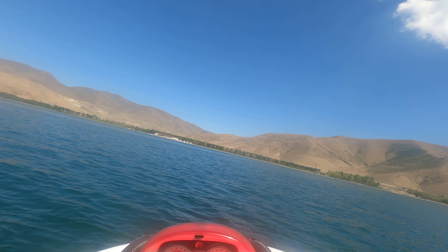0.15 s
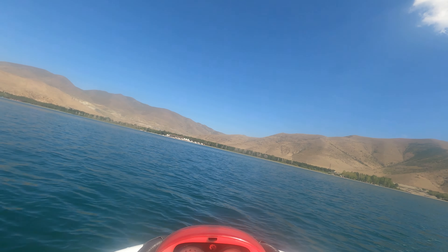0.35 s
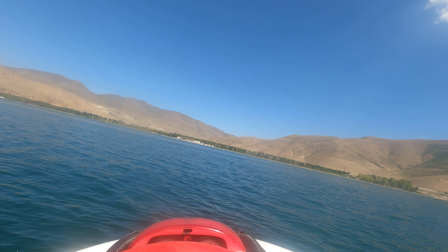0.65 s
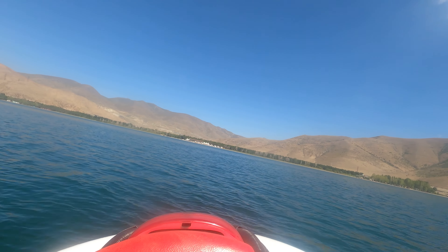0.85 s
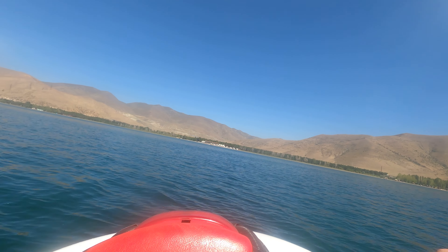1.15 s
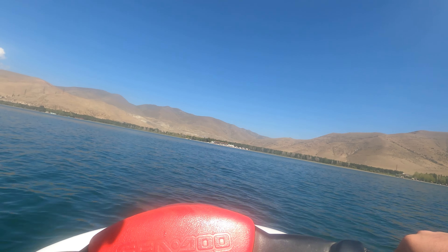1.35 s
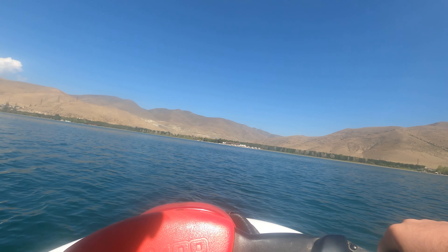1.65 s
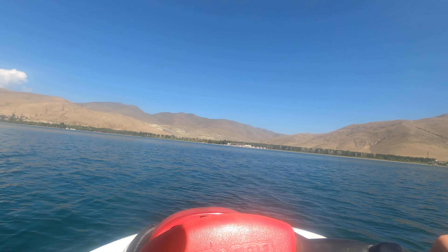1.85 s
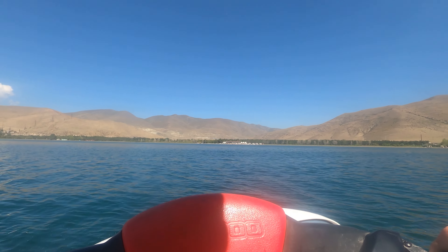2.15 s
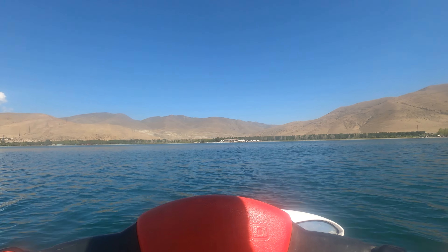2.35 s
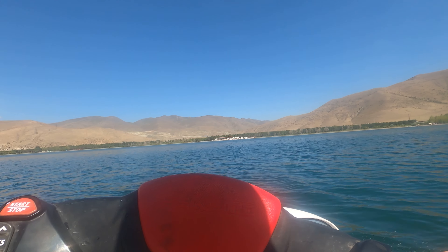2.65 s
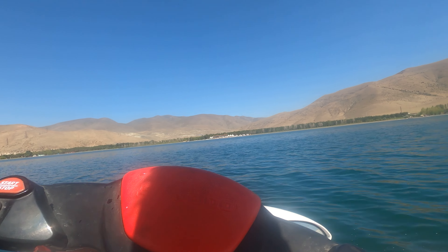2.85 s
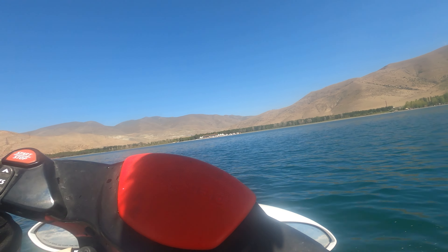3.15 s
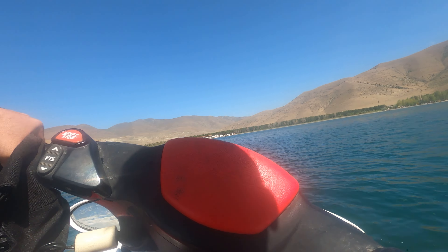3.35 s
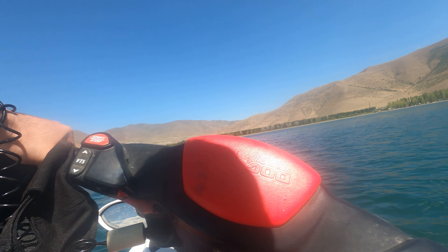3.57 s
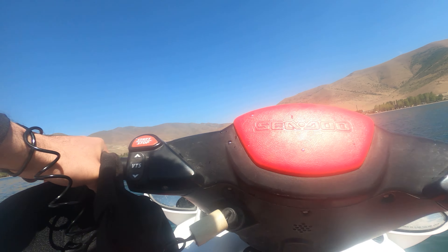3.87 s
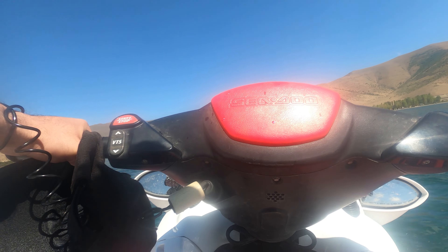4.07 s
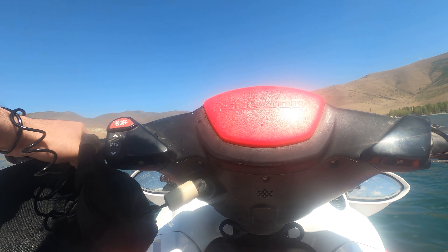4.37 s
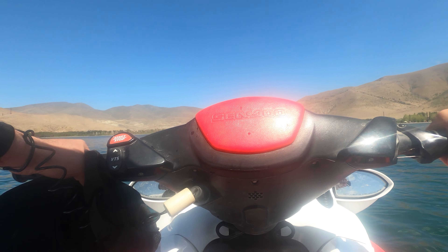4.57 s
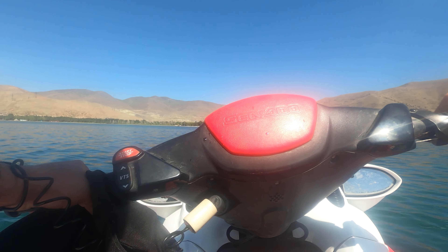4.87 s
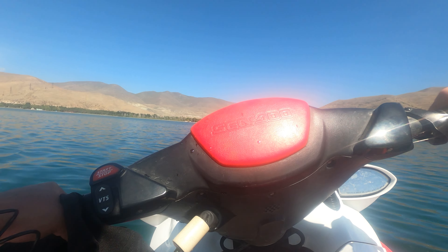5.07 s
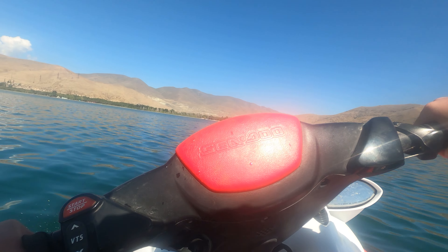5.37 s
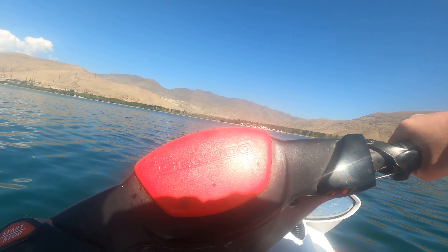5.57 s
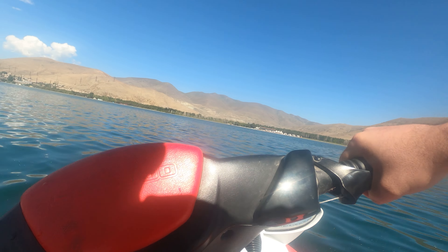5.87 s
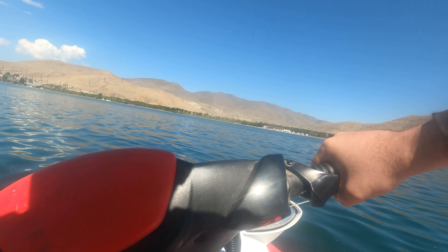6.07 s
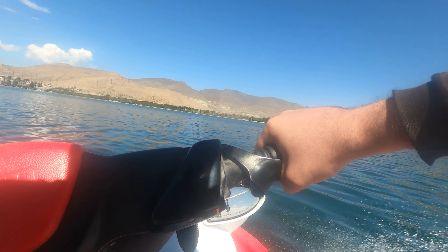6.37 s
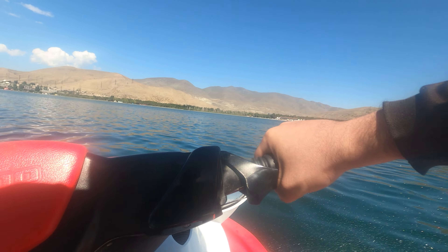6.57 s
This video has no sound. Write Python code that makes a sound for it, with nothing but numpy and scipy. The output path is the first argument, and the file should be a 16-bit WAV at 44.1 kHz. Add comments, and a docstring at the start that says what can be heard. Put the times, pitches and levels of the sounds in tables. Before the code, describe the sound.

A close, windy onboard sound: a three-cylinder engine hums and growls continuously at nearly constant speed, with rattling clatter and water rushing along the hull. Spray flares in short bursts. The growl thins around two seconds, returns with a whine and bubbling exhaust between three and four, thins again, then strengthens towards the end. Wind thumps throughout, and the wide stereo closes to the centre by three seconds.

```python
"""Riding a personal watercraft

A small watercraft cruises over a lake at steady throttle, heard from the rider's chest.
Wind buffets the microphone, water rushes along the hull, spray hisses and gusts slap: all shaped noise.
The three-cylinder engine drones in tones tied to its slightly hunting speed, with a whine and a clatter.
The exhaust gurgles when it dips under water. Part-way through, the wide stereo image closes almost to mono.
"""
import sys
import numpy as np
from scipy import signal
from scipy.fft import rfft, irfft
from scipy.io import wavfile
from scipy.ndimage import uniform_filter1d, minimum_filter1d

SR = 44100
rng = np.random.default_rng(int(sys.argv[2]) if len(sys.argv) > 2 else 0)


def store_wav(level_fs):
    """Save 16-bit WAV to argv[1]."""
    pcm = np.round(np.clip(np.atleast_2d(level_fs), -1, 1) * 32767)
    wavfile.write(sys.argv[1], SR, pcm.T.astype(np.int16))


N = 296352
TIME = np.arange(N) / SR
BINS = np.fft.rfftfreq(N, 1 / SR)
FIRINGS = 3  # per engine cycle, which is two crank turns


def amp(db):
    """Turns decibels into a gain."""
    return 10 ** (np.asarray(db) / 20)


def unit(x):
    """Scales a sound to an average strength (rms) of 1."""
    return x / np.sqrt(np.mean(x ** 2) + 1e-20)


def curve(rows):
    """Joins (time [s], value) rows with straight lines."""
    return np.interp(TIME, *np.transpose(rows))


def across(points):
    """Joins (frequency [Hz], value) rows with straight lines on a log-frequency axis."""
    hz, value = np.transpose(points)
    return np.interp(np.log(BINS + 1), np.log(hz + 1), value)


def swells(rows):
    """Adds up bell-shaped swells from (time [s], length [s], height [dB]) rows."""
    total = np.zeros(N)
    for s, length, db in rows:
        total = total + db * np.exp(-(2 * (TIME - s) / length) ** 2)
    return total


def wander(rate_hz):
    """Smooth random drift of rms 1; changes much faster than the given rate are filtered out."""
    spectrum = rfft(rng.standard_normal(N))
    return unit(irfft(spectrum / (1 + (BINS / rate_hz) ** 4), N))


def tint(x, colour, modes=()):
    """Colours a sound by a spectrum and by resonances, which lift narrow bands; rms 1."""
    db = across(colour)
    for hz, width, lift in modes:
        db = db + lift / (1 + (2 * (BINS - hz) / width) ** 2)
    return unit(irfft(rfft(x) * amp(db), N))


# How alike the left and right noise is: (frequency [Hz], likeness [0 to 1])
LIKENESS = [(30, .7), (70, .8), (120, .92), (300, .95), (700, .94), (1500, .9), (2800, .77), (5000, .6),
            (8000, .45), (12000, .15)]


def noise(colour, modes=(), drive=1):
    """Turbulence at two microphone ports, least alike in the treble; drive shapes it before colouring."""
    shared, apart = rfft(rng.standard_normal((2, N)) * drive)
    same = np.clip(across(LIKENESS), 0, 1)
    mid = shared * np.sqrt(1 + same)
    side = apart * np.sqrt(1 - same)
    return tint(irfft(np.array([mid + side, mid - side]), N), colour, modes)


# Wind strength at the microphone: (time [s], level [dB])
WIND_STRENGTH = [(0, -2.5), (1.4, 0), (1.95, -0.5), (2.3, -4), (3.7, 4.5), (5.1, 2.5), (6.1, -2.5),
                 (6.72, 1.5)]
# Which way the microphone faces: (time [s], 0 to the bow up to 1 down at the handlebars)
FACING = [(0, 0.013), (1.1, 0.097), (1.8, 0.45), (2.7, 0.47), (3.2, 1), (4.3, 0.91), (4.7, 0.69),
          (5.6, 0.77), (6.1, 0.42), (6.72, 0)]
# Relative spectra of the buffeting and the rush: (frequency [Hz], level [dB per Hz])
BUFFET_COLOUR = [(6, -9), (16, -2.5), (26, 3), (50, -2), (80, -3), (130, -11), (200, -8.5), (300, -15),
                 (600, -29.5), (2000, -79.5)]
RUSH_COLOUR = [(40, -17.5), (100, -1), (200, 0.5), (320, 1.5), (400, -4.5), (470, -5), (560, -5.5),
               (670, -9.5), (750, -9.5), (850, -19.5), (1200, -23.5), (3000, -42), (8000, -76.5)]


def wind(eddies, buffet_db=-23.0, gust_db=1., gust_hz=11.0,
         rush_db=-22.0, rush_follow=0.35, rush_facing_db=-1.5, flutter_db=1.9):
    """Gusty low buffeting on the microphone, and a rush that flutters with the eddies."""
    buffet_level = buffet_db + curve(WIND_STRENGTH) + gust_db * wander(gust_hz)
    buffet = amp(buffet_level) * noise(BUFFET_COLOUR)
    # the rush follows only part of the wind's rise and fall
    rush_level = rush_db + rush_follow * curve(WIND_STRENGTH) + rush_facing_db * curve(FACING)
    rush = amp(rush_level) * noise(RUSH_COLOUR, drive=amp(flutter_db * eddies))
    return buffet + rush


# How much water the hull throws up: (time [s], level [dB])
WAKE = [(0, 2.5), (.4, -2), (1.7, 3.5), (2.1, -4), (2.5, -4), (3.3, 1), (4.5, -.5), (4.8, -1), (5.2, -1.5),
        (5.7, 0.5), (6.15, -2), (6.6, 2)]
# The hull meets a wavelet and the spray flares: (time [s], length [s], lift [dB])
SPLASHES = [(.19, 0.025, 4), (.6, .06, 5.5), (.77, 0.066, 5), (2.1, .04, 4), (2.83, .06, 4),
            (3.38, 0.066, 5), (3.62, .04, 3), (3.76, 0.14, 6), (4.25, 0.037, 6.5), (4.55, 0.11, 3),
            (5.53, 0.044, 3.5)]
# Relative spectrum of the hiss: (frequency [Hz], level [dB per Hz])
SPRAY_COLOUR = [(500, -15.5), (1500, 1.5), (2800, 3.5), (4000, 1.5), (5500, -2.5), (7000, -5), (7900, -7.5),
                (8600, -12.5), (10000, -15.5), (12000, -26.5), (15000, -40.5)]
# Ringing of the small microphone port: (frequency [Hz], width [Hz], lift [dB])
PORT_MODE = [(7620, 330, 7)]
# Level of the faint treble band above about 9 kHz, before its overall boost: (time [s], level [dB])
TREBLE_LEVEL = [(0, -65), (1.0, -67), (1.93, -66), (2.02, -90), (2.9, -86), (3.35, -73), (3.76, -66),
                (4.0, -90), (6.1, -90), (6.72, -78)]
# Relative spectrum of the faint treble band: (frequency [Hz], level [dB per Hz])
TREBLE_COLOUR = [(5000, -29.5), (8500, -9), (10000, -2), (11000, -2), (12200, 1), (13500, -5.5),
                 (15500, -7.5)]


def spray(eddies, chop, level_db=-44.5, flutter_db=0.64, grain_db=0.6, treble_boost_db=2.5):
    """Grainy hiss of thrown water, ringing the port, with a faint top-treble band that cuts in and out."""
    grain = amp(flutter_db * eddies + grain_db * wander(700))
    hiss_level = level_db + curve(WAKE) + swells(SPLASHES) + chop
    hiss = amp(hiss_level) * noise(SPRAY_COLOUR, PORT_MODE, grain)
    treble = amp(curve(TREBLE_LEVEL) + treble_boost_db) * noise(TREBLE_COLOUR, drive=grain)
    return hiss + treble


# Sharp gusts: (time [s], level before panning [dB], rise [s], fall [s],
#               pan [-1 left to 1 right], bright snap [share of the gust's strength])
SLAPS = [(1.951, -24, .002, .008, -.9, .05), (1.964, -20, .01, .006, -.9, .1),
         (2.005, -29, .012, .008, .9, 0), (2.102, -23, .002, .008, -.6, .2),
         (2.315, -30, .01, .015, -.9, .15), (3.576, -26, .002, .005, 0, .1),
         (4.044, -25, .002, .006, 0, .1), (4.738, -26, .002, .006, 0, .15), (4.838, -28, .016, .008, 0, 0),
         (4.908, -30, .008, .008, 0, 0), (5.013, -26, .004, .002, 0, .05), (5.049, -17, .007, .002, 0, .2),
         (5.0545, -14.5, .002, .003, 0, .35), (5.101, -21, .001, .003, 0, 0),
         (5.121, -28, .008, .012, 0, .1), (5.1305, -18.5, .001, .002, 0, .5),
         (6.413, -25, .002, .005, 0, .1)]
# Relative spectra of the slap and its snap: (frequency [Hz], level [dB per Hz])
SLAP_COLOUR = [(60, -8), (300, 14), (900, 17), (1400, 6), (2100, -9.5), (3200, -29.5), (5000, -28),
               (12000, -55.5)]
SNAP_COLOUR = [(500, -20), (1400, 5), (2000, 2), (3200, -9.5), (4500, -16.5), (7000, -25.5), (12000, -48.5)]


def slaps():
    """Each sharp gust builds for a moment and breaks off; some strike one port harder, some carry a snap."""
    force, snap = np.zeros((2, 2, N))
    for s, db, rise, fall, pan, bright in SLAPS:
        shape = np.exp(-np.maximum((s - TIME) / rise, (TIME - s) / fall))
        gust = np.outer([1 - pan, 1 + pan], amp(db) * shape)
        force = force + gust
        snap = snap + bright * gust
    return force * noise(SLAP_COLOUR) + snap * noise(SNAP_COLOUR)


# Relative spectrum of exhaust blowing through water: (frequency [Hz], level [dB per Hz])
GURGLE_COLOUR = [(20, -30.5), (60, -12), (105, 1.5), (170, -4.5), (340, 5), (600, -1.5), (800, -3.5),
                 (1200, -15), (3000, -42), (12000, -90)]


def gurgle(cycles, dunk, level_db=-21.0, puff_db=1.5):
    """What a dunk takes from the boom comes back as bubbling, puffed out by each firing."""
    puffs = amp(puff_db * np.cos(2 * np.pi * FIRINGS * cycles))
    taken = 1 - amp(-dunk)
    return amp(level_db) * taken * noise(GURGLE_COLOUR, drive=puffs)


# Base engine speed: (time [s], speed [cycles per second])
SPEED = [(0, 42.6), (1.6, 42.58), (2.2, 42.63), (3.3, 42.62), (3.7, 42.85), (4.5, 42.8), (5.0, 42.5),
         (6.72, 42.45)]


def crank(hunt_hz=6.6, hunt_depth=0.0175, jitter=0.00532):
    """Counts engine cycles; the speed hunts up and down several times a second and jitters slightly."""
    hunt_rate = hunt_hz * (1 + 0.149 * wander(2.496))
    hunt = np.sin(2 * np.pi * np.cumsum(hunt_rate) / SR)
    speed = curve(SPEED) * (1 + hunt_depth * hunt + jitter * wander(30))
    return np.cumsum(speed) / SR


# Gear whine, lying between the engine orders: (time [s], level [dB])
WHINE_LEVEL = [(0, -47), (.85, -42), (2.0, -45), (3.0, -41), (3.4, -28.5), (4.15, -33), (4.4, -46),
               (5.7, -44.5), (6.1, -35.5), (6.72, -37)]


def whine(cycles, gear_ratio=17.4, octave_db=-14.5, rough=0.5, slip=.07):
    """A wavering gear tone and its octave, geared to the crank."""
    turns = gear_ratio * cycles + slip * wander(22)  # slip in turns of the gear mesh
    sound = np.cos(2 * np.pi * turns) + amp(octave_db) * np.cos(2 * np.pi * 2 * turns)
    return amp(curve(WHINE_LEVEL)) * unit(sound * (1 + rough * wander(9.8)))


# How strongly the clatter reaches the microphone: (time [s], level [dB])
BAY_LEVEL = [(0, -0.5), (.55, -1), (1.93, 0.5), (2.1, -2), (2.8, -2), (3.7, -2.5), (4.1, -0.5), (4.4, -4.5),
             (4.7, -5), (5.2, -10.5), (5.55, -7.5), (5.8, -5), (6.72, -0.5)]
# Relative spectrum of the clatter: (frequency [Hz], level [dB per Hz])
CLATTER_COLOUR = [(200, -23.5), (500, -10), (750, -0.5), (900, 4), (1250, -3.5), (1700, -5.5), (2300, -11),
                  (3200, -18.5), (5000, -26.5), (8000, -36), (14000, -66)]
# Engine bay resonances facing the bow, then facing down: (frequency [Hz], width [Hz], lift [dB])
BOW_MODES = [(740, 36, 7.5), (1020, 91, 4.5), (1620, 170, 1.5), (2800, 230, 0)]
DOWN_MODES = [(750, 210, 5), (1150, 240, -3.5), (1465, 150, 6), (2750, 250, 5)]


def clatter(cycles, eddies, chop, level_db=-28.5, knock_db=-7.0,
            turn_db=0.5, firing_db=0.3, flutter_db=1.0, size=1024):
    """Mechanical noise swells with each crank turn and each firing, and rings the engine bay."""
    turn_beat = turn_db * np.cos(2 * np.pi * 2 * cycles)
    firing_beat = firing_db * np.cos(2 * np.pi * FIRINGS * cycles)
    drive = amp(turn_beat + firing_beat + flutter_db * eddies)
    down = np.clip(curve(FACING), 0, 1)
    sound = np.zeros((2, N))
    for share, modes in (1 - down, BOW_MODES), (down, DOWN_MODES):
        # valves and pistons repeat the same train of knocks in every cycle
        train = rng.standard_normal(size)
        knocks = np.interp(cycles, np.arange(size) / size, train, period=1)
        rattle = noise(CLATTER_COLOUR, modes, drive)
        knocking = amp(knock_db) * tint(knocks * drive, CLATTER_COLOUR, modes)
        sound += np.sqrt(share) * (rattle + knocking)
    return amp(level_db + curve(BAY_LEVEL) + chop) * sound


def tone(cycles, order, unevenness, dispersion=.125):
    """One multiple (order) of the cycle rate, uneven in strength; phase shifts smear the exhaust pulse."""
    # the exhaust delays high orders more
    phase = order * cycles - dispersion * order ** 2
    return np.sqrt(2) * np.cos(2 * np.pi * phase) * (1 + unevenness * wander(15))


# Balance of the growl's tones: (multiple of the cycle rate, relative level [dB])
GROWL_ORDERS = [(8, 0.5), (9, 3.5), (10, -4.5), (11, -11), (12, -7.5), (13, -6.5), (14, -3), (15, -1.5),
                (16, -12), (17, -8.5), (18, -7.5), (19, -12.5), (21, -9), (23, -16.5), (24, -10.5),
                (25, -22)]
# Strength of the whole growl: (time [s], level [dB])
GROWL_LEVEL = [(0, -34), (1.9, -34), (2.1, -40.5), (2.9, -35), (3.6, -34), (4.15, -34.5), (4.4, -42),
               (5.3, -40), (5.9, -32.5), (6.72, -33)]


def growl(cycles):
    """The higher orders, which swell and fade as the craft turns."""
    orders = sum(amp(db) * tone(cycles, order, unevenness=.33) for order, db in GROWL_ORDERS)
    return amp(curve(GROWL_LEVEL)) * orders


# Low hum beside the firing note and boom: (multiple of the cycle rate, relative level [dB])
HUM_ORDERS = [(2, -10), (4, 0), (5, -1.5), (7, -8.5)]
# Firing note, three to a cycle, sinking in the middle of the turn: (time [s], level [dB])
FIRING_LEVEL = [(0, -19), (1.9, -20.5), (2.1, -20.5), (3, -24.5), (4.1, -30), (4.55, -25), (5.3, -29),
                (6.72, -18)]
# Exhaust boom, an octave above the firing note: (time [s], level [dB])
BOOM_LEVEL = [(0, -13), (1.3, -15.5), (1.65, -12.5), (2.0, -16.5), (3.0, -16), (3.9, -13.5), (4.45, -16.5),
              (5.05, -16.5), (6.2, -15), (6.72, -16.5)]


def drone(cycles, dunk, bob, hum_db=-16.5, hum_follow=0.44, hum_rough=0.17, boom_rough=0.034,
          wobble_db=1.7, wobble_hz=8., waver_db=0.17, facing_waver_db=2.5, waver_hz=7.):
    """Exhaust tones: unequal cylinders fill in a hum; the boom rocks with the hull and chokes in dunks."""
    hum_tones = sum(amp(db) * tone(cycles, order, hum_rough) for order, db in HUM_ORDERS)
    hum = amp(hum_db + hum_follow * curve(FIRING_LEVEL)) * hum_tones
    # the firing note wavers more when the microphone faces down
    waver = (waver_db + facing_waver_db * curve(FACING)) * wander(waver_hz)
    firing = amp(curve(FIRING_LEVEL) + waver) * tone(cycles, FIRINGS, boom_rough)
    boom_level = curve(BOOM_LEVEL) + bob - dunk + wobble_db * wander(wobble_hz)
    boom = amp(boom_level) * tone(cycles, 2 * FIRINGS, boom_rough)
    return hum + firing + boom


# The exhaust outlet dips under water, choking the boom: (time [s], length [s], depth [dB])
DUNKS = [(.32, .04, 1), (.47, .04, 6.5), (1.4, .05, 4), (1.99, 0.27, 4), (2.58, .14, 2.5), (2.8, 0.077, 4),
         (3.17, 0.07, 19), (3.62, 0.069, 13), (3.72, 0.075, 17), (4.05, 0.15, 9.5), (4.18, 0.087, 24),
         (5.02, 0.1, 7.5), (5.13, 0.045, 7), (5.53, 0.071, 5), (5.69, .08, 14), (6.55, 0.041, 15)]
# The clatter and hiss drop away briefly: (time [s], length [s], depth [dB])
LULLS = [(2.04, 0.066, 5.5), (2.31, 0.046, 2), (3.47, 0.067, 3), (4.42, 0.045, 2), (4.79, 0.048, 4),
         (5.16, 0.1, 4.5), (5.45, 0.05, 4.5), (5.62, 0.068, 5), (6.12, 0.043, 0.5)]


def scene(chop_db=0.7, chop_hz=11.0, bob_db=-0.35, bob_hz=3.98):
    """Wind, water and engine; shared eddies shake the noises, and chop rocks clatter and spray alike."""
    cycles, dunk = crank(), swells(DUNKS)
    eddies = unit(wander(53) + .5 * wander(220))
    chop = chop_db * wander(chop_hz) - swells(LULLS)
    bob = bob_db * np.cos(2 * np.pi * bob_hz * TIME)
    surroundings = wind(eddies) + spray(eddies, chop) + slaps() + gurgle(cycles, dunk)
    engine = whine(cycles) + clatter(cycles, eddies, chop) + growl(cycles) + drone(cycles, dunk, bob)
    fade = signal.windows.tukey(N, .001)  # a few milliseconds at each end
    return fade * (surroundings + engine)


def limit(x, ceiling_db=-3.5, hold_s=0.016, order=6):
    """A quick limiter with a soft knee turns down the loudest peaks in both channels together."""
    span = max(int(hold_s * SR), 2)
    gain = (1 + (abs(x).max(0) / amp(ceiling_db)) ** order) ** (-1 / order)
    return x * uniform_filter1d(minimum_filter1d(gain, span), span)


# Colour difference of the ports, before the width changes: (frequency [Hz], left minus right [dB])
LEAN = [(60, 4.5), (130, -2), (270, -0.5), (580, -1.5), (1220, -2.5), (2600, -1.5)]
# Stereo width, as gain on the left-right difference: (time [s], level [dB])
WIDTH = [(0, -4), (1.0, 1), (1.9, 3), (2.05, 4), (2.2, -0.5), (2.5, -5), (2.8, -12.5), (3.05, -46.5),
         (6.72, -50.5)]


def record(dry, edge_hz=15700):
    """Limits peaks, colours the two ports, varies the stereo width and cuts the highest treble."""
    port_gain = amp(np.outer([.5, -.5], across(LEAN)))
    left, right = irfft(rfft(limit(dry)) * port_gain, N)
    mid = (left + right) / 2
    side = (left - right) / 2 * amp(curve(WIDTH))
    low_pass = signal.firwin(511, edge_hz, window=("kaiser", 9), fs=SR)
    return signal.oaconvolve(np.array([mid + side, mid - side]), low_pass[None], "same")


dry = scene()
out = record(dry)
store_wav(out)
```